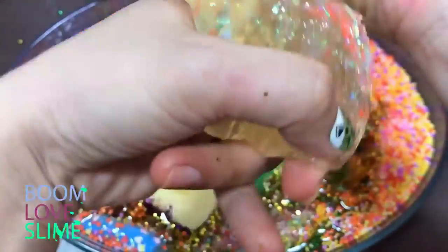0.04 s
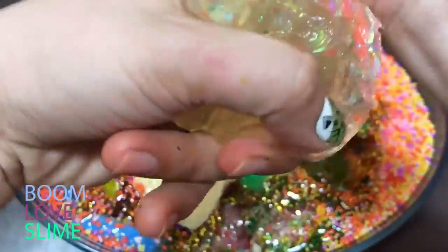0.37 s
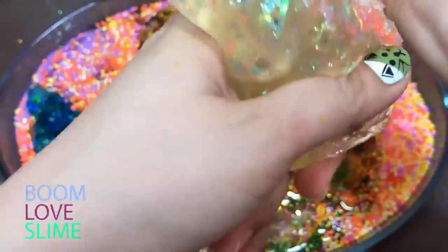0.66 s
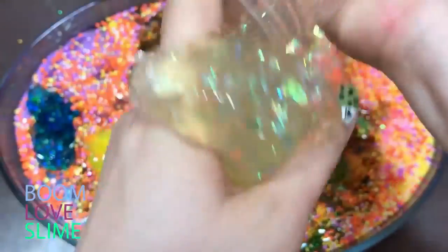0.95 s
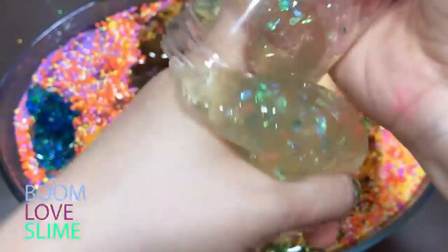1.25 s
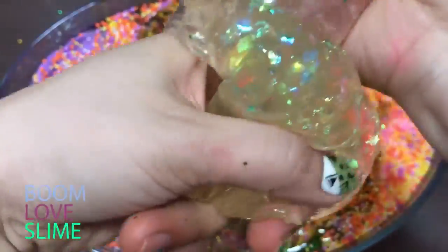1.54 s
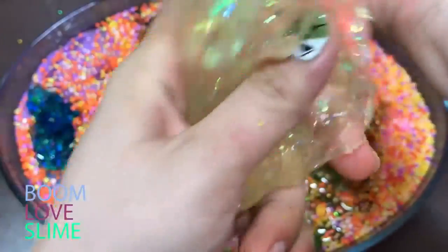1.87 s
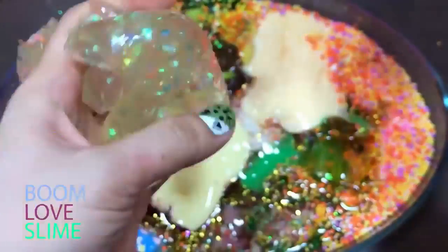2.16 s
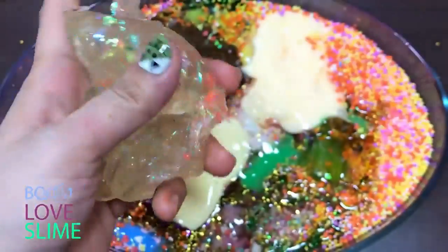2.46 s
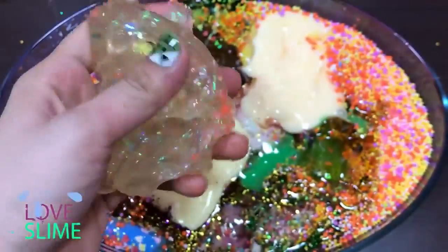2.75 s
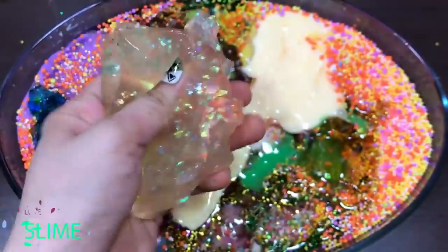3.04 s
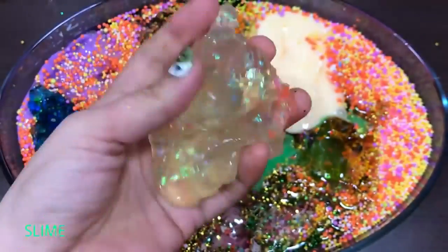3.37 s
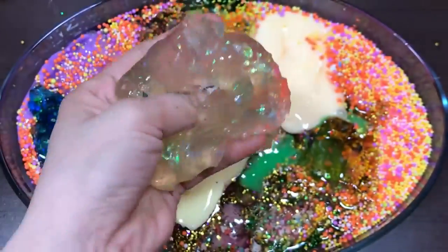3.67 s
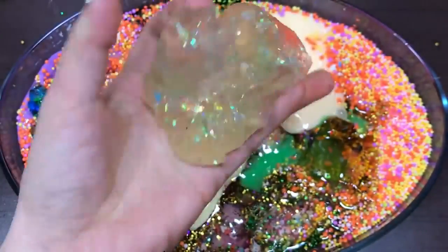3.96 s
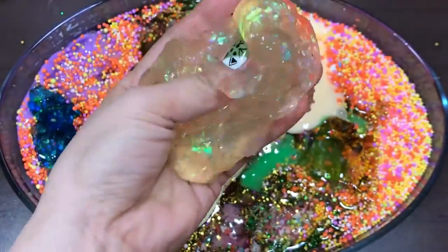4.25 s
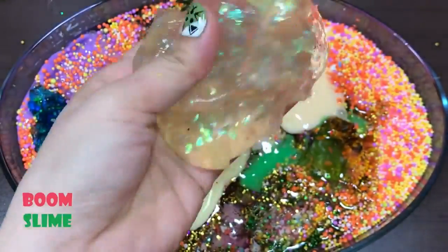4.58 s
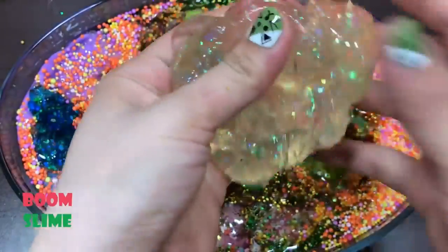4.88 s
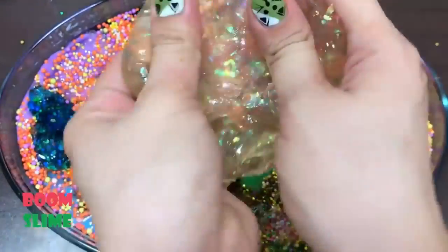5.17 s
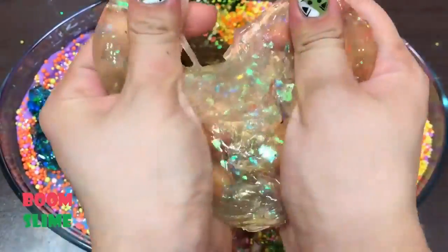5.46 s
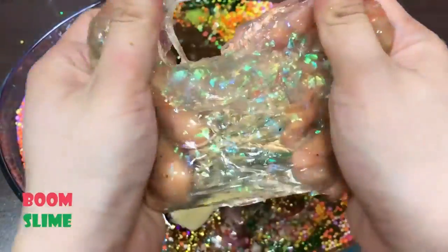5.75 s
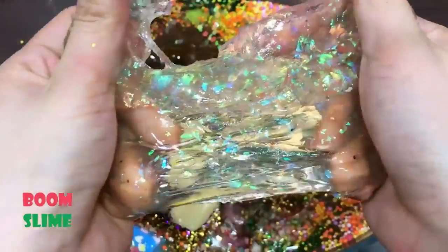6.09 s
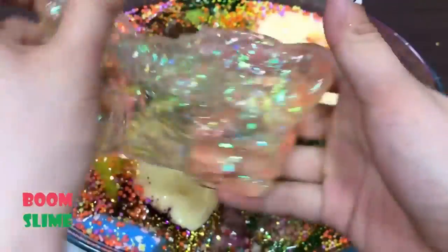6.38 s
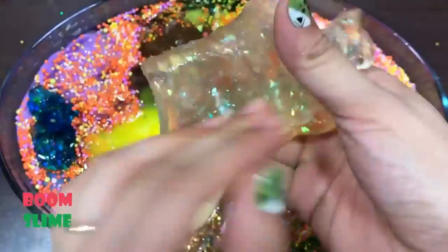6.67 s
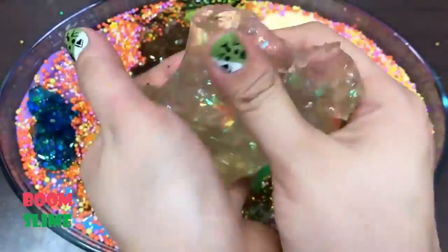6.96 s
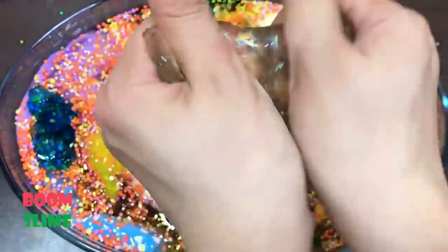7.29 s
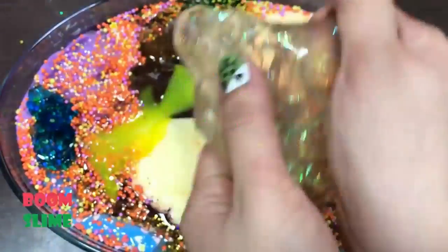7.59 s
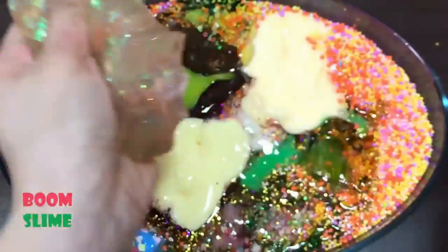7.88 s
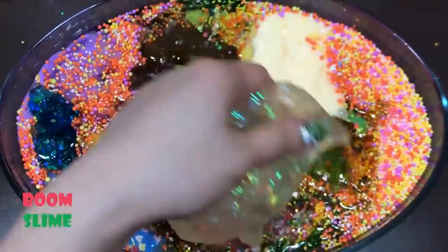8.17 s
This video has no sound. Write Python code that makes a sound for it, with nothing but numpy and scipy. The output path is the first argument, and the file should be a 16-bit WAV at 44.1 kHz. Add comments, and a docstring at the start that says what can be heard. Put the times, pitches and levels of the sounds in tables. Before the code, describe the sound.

Close, reverberant slime squeezing: trapped air bursts sharply, followed by soft sticky crackling, scattered pops and faint low whooshes.

```python
"""Sticky slime is squeezed out of a plastic tube and kneaded over a bowl, close up, with a long reverb.
Over a low hum and faint hiss, a soft low whoosh fades at the start. At 1 s trapped air bursts out
in one loud crack. Throughout, small air pockets pop, squeak and gulp, and the slime crackles as it
peels off the skin. A soft knock booms at 3.4 s; from 6.5 s the whoosh comes four more times."""
import sys
import numpy as np
from scipy import signal
from scipy.fft import rfft, irfft
from scipy.io import wavfile
from scipy.ndimage import uniform_filter1d

SR = 44100
rng = np.random.default_rng(int(sys.argv[2]) if len(sys.argv) > 2 else 0)


def digitize_waveform(pressure):
    """Quantize a signal to 16-bit integers and store it at the path in sys.argv[1].

    Rows of a 2-D input are taken as channels; values are limited to [-1, 1].
    """
    field = np.atleast_2d(pressure).T
    bounded = np.clip(field, -1, 1)
    quanta = np.round(bounded * 32767).astype(np.int16)
    wavfile.write(sys.argv[1], SR, quanta)


N = 362943
TIME = np.arange(N) / SR
CUTOFF_HZ = 16000


def from_db(db):
    """Decibels to gain."""
    return 10 ** (np.asarray(db) / 20)


def unit_rms(x):
    """Scale to rms 1."""
    return x / np.sqrt(np.mean(x ** 2) + 1e-20)


def held(x, length_s):
    """Scale a short sound to the energy of rms 1 held for length_s."""
    return x * np.sqrt(length_s * SR / (np.sum(x ** 2) + 1e-20))


def band(x, low_hz, high_hz, order=2):
    """Causal band-pass."""
    high_hz = min(high_hz, .45 * SR)
    low_hz = min(low_hz, .98 * high_hz)
    return signal.sosfilt(signal.butter(order, [low_hz, high_hz], "band", fs=SR, output="sos"), x)


def colour(x, spectrum, size=8192):
    """Minimum-phase filter through (Hz, dB) points."""
    hz, level_db = np.transpose(spectrum)
    bins_hz = np.fft.rfftfreq(size, 1 / SR)
    gain = from_db(np.interp(np.log(bins_hz + 1), np.log(hz), level_db))
    cepstrum = irfft(np.log(gain))[:size // 2]
    cepstrum[1:] *= 2
    impulse = irfft(np.exp(rfft(cepstrum, size)))
    return signal.fftconvolve(x, impulse)[:len(x)]


def add(out, start_s, sound):
    """Mix a sound in at start_s."""
    at = round(start_s * SR)
    sound = sound[max(-at, 0):N - at]
    out[max(at, 0):max(at, 0) + len(sound)] += sound


# Hiss spectrum. Each row: frequency in Hz, relative density in dB.
HISS_SPECTRUM = [(18, -40), (30, -5.5), (49, -3), (71, 2.5), (822, -21), (1160, -17.5), (2120, -24),
                 (2610, -22), (5310, -33.5), (10500, -31.5), (11400, -41.5), (14800, -25.5), (16000, -39.5)]
# Hum bands. Each row: centre in Hz, width in Hz, level in dB.
HUM_BANDS = [(57.8, 3.2, -66), (64.64, 3.4, -58.5), (107, 15, -76), (126, 11, -69)]


def background(hiss_db=-60.5):
    """Faint hiss and a wavering low hum of narrow noise bands."""
    out = from_db(hiss_db) * unit_rms(colour(rng.standard_normal(N + SR), HISS_SPECTRUM)[SR:])
    for hz, width_hz, level_db in HUM_BANDS:
        hum = band(rng.standard_normal(N + SR), hz - width_hz / 2, hz + width_hz / 2)[SR:]
        out += from_db(level_db) * unit_rms(hum)
    return out


# Reverb response. Each row: frequency in Hz, gain in dB, T60 in seconds.
REVERB_RESPONSE = [(60, -5.5, 5.3), (298, -0.5, 1.05), (390, 4.5, 1), (610, 0, 1), (1530, -1.5, 1),
                   (2100, -1.5, 1), (3784, -2, 1), (7000, -0.5, 0.96), (9507, -3.5, 0.93),
                   (15000, -7.5, 0.49)]


def reverb(x, onset_s=0.011, bloom_s=.18, bloom_db=3.0, bands=26, hop=64):
    """A diffuse tail: each band stores energy and returns it as dying noise, swelling a second time."""
    t = TIME[:2 * SR:hop]
    bloom = from_db(bloom_db * np.clip((t - bloom_s) / .025 + .5, 0, 1))
    shape = np.clip(t / onset_s, 0, 1) * bloom
    points_hz, points_db, points_t60_s = np.transpose(REVERB_RESPONSE)
    edges_hz = np.geomspace(300, 16300, bands + 1) - 230
    white = rng.standard_normal((2, N))
    out, starts = np.zeros(N), np.arange(0, N, hop)
    for k, (low_hz, high_hz) in enumerate(zip(edges_hz, edges_hz[1:])):
        log_centre = np.log(low_hz * high_hz) / 2
        gain_db = np.interp(log_centre, np.log(points_hz), points_db)
        t60_s = np.interp(log_centre, np.log(points_hz), points_t60_s)
        decay = (shape * from_db(-60 * t / t60_s)) ** 2
        power = np.add.reduceat(band(x, low_hz, high_hz, order=3) ** 2, starts) / hop
        stored = np.convolve(power, decay / decay.sum())[:len(starts)]
        envelope = np.repeat(np.sqrt(stored), hop)[:N]
        out += from_db(gain_db) * envelope * unit_rms(band(white[k % 2], low_hz, high_hz))
    return out


# Noise bands of one whoosh. Each row: low and high edge in Hz, peak delay, rise and decay in seconds,
# level in dB.
WHOOSH_BANDS = [(319, 407, 0.072, 0.031, 0.022, -54), (204, 515, 0.16, 0.075, 0.16, -53.5),
                (42.8, 160, 0.17, 0.062, 0.26, -51), (840, 3000, 0.11, 0.032, 0.66, -65)]
# Whooshes. Each row: start in seconds, gain in dB.
WHOOSH_EVENTS = [(-.14, 5), (6.45, 3), (6.902, 3.5), (7.388, -1), (7.873, 2)]


def whooshes():
    """One soft swell of low noise, repeated; its bass comes late and lingers."""
    out, whoosh, t = np.zeros(N), np.zeros(SR), TIME[:SR]
    for low_hz, high_hz, peak_s, rise_s, decay_s, level_db in WHOOSH_BANDS:
        rise = np.exp(-.5 * ((t - peak_s) / rise_s) ** 2)
        fall = np.exp((peak_s - t) / decay_s)
        noise = unit_rms(band(rng.standard_normal(SR), low_hz, high_hz))
        whoosh += from_db(level_db) * np.where(t < peak_s, rise, fall) * noise
    for start_s, gain_db in WHOOSH_EVENTS:
        add(out, start_s, from_db(gain_db) * whoosh)
    return out


# Modes rung by the knock. Each row: frequency in Hz, level in dB re the knock, T60 in seconds.
KNOCK_RESONANCES = [(72, -23, .5), (110, -0.5, 1.5), (217, -4, 1.08), (240, 4.5, 0.11), (296, -6.5, 0.8),
                    (427, -16.5, 0.88), (815, -11, 0.36), (995, -28, 0.41), (1880, -27, 0.86),
                    (3050, -13.5, 0.67), (3070, -20, .4), (4600, -22, 0.47), (6630, -25, 0.55)]


def knock(start_s=3.359, level_db=-45.5, rumble_db=-7.5, rumble_t60_s=0.84,
          flutter_db=7.0, flutter_s=0.012):
    """A soft knock leaves a low boom, faint fluttering overtones and a rough dying rumble."""
    out, t = np.zeros(N), TIME[:2 * SR]
    for hz, mode_db, t60_s in KNOCK_RESONANCES:
        flutter = np.interp(t / flutter_s, np.arange(SR), rng.standard_normal(SR))
        envelope = from_db(level_db + mode_db + flutter_db * flutter - 60 * t / t60_s)
        add(out, start_s, envelope * np.sin(2 * np.pi * hz * t))
    rumble = unit_rms(band(rng.standard_normal(len(t)), 150, 660, order=1))
    add(out, start_s, from_db(level_db + rumble_db - 60 * t / rumble_t60_s) * rumble)
    return out


# Hand activity. Each row: time in seconds, gain in dB on ticks, cling crackle and small pops.
HAND_ACTIVITY = [(0, 6.5), (.7, 7), (2.1, 7), (2.7, -4), (3.6, 1.5), (4.2, -6.5), (5.0, -2), (5.45, 2.5),
                 (6.1, -10), (6.8, 2), (7.4, 4), (8.2, -7.5)]


def kneading_db(time_s):
    """How busily the hands work the slime, as a gain."""
    return np.interp(time_s, *np.transpose(HAND_ACTIVITY))


def threads(per_s, low_hz, high_hz, spread_db, db_per_octave, bands=7):
    """Tiny threads snap at random, each with its own size and pitch band; rms 1."""
    sizes = from_db(spread_db * np.minimum(rng.exponential(1, N), 4)) * rng.choice([-1, 1], N)
    clicks = sizes * (rng.random(N) < per_s / SR)
    click_band = rng.integers(0, bands, N)
    out = np.zeros(N)
    for k, hz in enumerate(np.geomspace(low_hz, high_hz, bands)):
        snaps = band(clicks * (click_band == k) + 1e-18, hz / 1.6, hz * 2.2, order=1)
        out += from_db(db_per_octave * np.log2(hz / low_hz)) * snaps
    return unit_rms(out)


# Pulls off the skin. Each row: peak time in seconds, Gaussian width in seconds, crackle level in dB,
# squelch in dB re the crackle.
SKIN_PULLS = [(0.374, 0.024, -52, -26), (0.573, 0.0083, -54, -4.5), (0.605, .018, -54, 0),
              (0.81, 0.051, -64.5, 8.5), (1.598, 0.04, -50, -3.5), (1.79, 0.064, -66.5, 5.5),
              (1.934, .02, -52, 7.5), (1.98, 0.017, -39, -2.5), (2.024, 0.031, -49, -4),
              (2.107, 0.016, -56, -10), (2.212, 0.022, -54.5, -5.5), (2.336, 0.01, -47, 0.5),
              (2.681, 0.01, -64.5, -6), (2.861, 0.028, -67, -10), (3.228, 0.022, -47, -13.5),
              (3.502, 0.0063, -57.5, -1), (3.701, .022, -65, -2), (3.749, 0.0092, -32.5, -27.5),
              (3.924, 0.015, -48.5, -14), (4.293, .014, -58, -18.5), (4.553, 0.017, -48, -15.5),
              (4.86, 0.029, -60.5, -9), (5.09, 0.014, -60, -17.5), (5.41, .07, -62, 1),
              (5.675, .007, -68, 9.5), (5.84, 0.055, -60.5, -13), (6.32, 0.052, -63.5, -11.5),
              (6.46, .04, -69, -10.5), (6.774, 0.019, -54, -3), (7.162, 0.025, -66.5, -16),
              (7.393, .022, -61, -20), (7.45, 0.008, -45.5, -21), (7.551, 0.03, -45, -4),
              (7.808, 0.015, -54, -1), (8.207, 0.012, -56.5, -2.5)]


def peeling(cling_db=-79, tick_db=-79, clump_db=3.5, clump_s=0.008):
    """Slime lets go of the skin in clumps of crackle and squelch; lone threads tick in between."""
    activity = from_db(kneading_db(TIME))
    crackle_gain = from_db(cling_db) * activity   # slime clinging to moving fingers
    squelch_gain = np.zeros(N)
    for peak_s, width_s, crackle_db, squelch_db in SKIN_PULLS:
        t = np.arange(-4 * width_s, 4 * width_s, 1 / SR)
        swell = from_db(crackle_db) * np.exp(-.5 * (t / width_s) ** 2)
        add(crackle_gain, peak_s + t[0], swell)
        add(squelch_gain, peak_s + t[0], from_db(squelch_db) * swell)
    wander = np.interp(TIME / clump_s, np.arange(N), rng.standard_normal(N))
    clumps = unit_rms(from_db(clump_db * wander))
    crackle = threads(per_s=1200, low_hz=3320, high_hz=15000, spread_db=3.8, db_per_octave=0.0)
    squelch = threads(per_s=1500, low_hz=204, high_hz=2600, spread_db=3.0, db_per_octave=-1.5)
    ticks = threads(per_s=43, low_hz=2500, high_hz=14000, spread_db=5.0, db_per_octave=-0.5)
    peel = clumps * (crackle_gain * crackle + squelch_gain * squelch)
    return peel + from_db(tick_db) * activity * ticks


# Short falling tones. Each row: start and length in seconds, start and end pitch in Hz, level in dB.
SQUEAKS_AND_GULPS = [(.002, .04, 720, 560, -47), (.572, .024, 1530, 1500, -49),
                     (.9713, .002, 2000, 900, -15), (.9728, .005, 480, 380, -18),
                     (1.944, .008, 1300, 900, -41), (1.990, .012, 450, 330, -42),
                     (5.667, .014, 3200, 350, -59), (7.255, .009, 14900, 14200, -38),
                     (7.267, .012, 1560, 1470, -40), (7.288, .023, 11100, 10900, -57)]


def squeaks_and_gulps(waver=0.019):
    """Short, unsteady falling tones, heard as high squeaks, low gulps and the burst's low ring."""
    out = np.zeros(N)
    for start_s, length_s, start_hz, end_hz, level_db in SQUEAKS_AND_GULPS:
        size = int(length_s * SR)
        flutter = 1 + waver * unit_rms(uniform_filter1d(rng.standard_normal(size), size=30))
        phase = 2 * np.pi * np.cumsum(np.geomspace(start_hz, end_hz, size) * flutter) / SR
        tone = unit_rms(np.sin(phase) * signal.windows.tukey(size, .4))
        add(out, start_s, from_db(level_db) * tone)
    return out


def tear(length_s, spread_db, snap):
    """A film gives way: one snap, then a fast-dying volley of tiny rips."""
    t = TIME[:SR // 20]
    rips = rng.standard_normal(len(t)) * from_db(spread_db * rng.standard_normal(len(t)))
    rips = unit_rms(rips) * np.exp(-(t / length_s) ** 1.3)
    rips[0] += snap
    return rips


def pocket(hz, length_s, waver=0.057):
    """An air pocket rings and dies; its soft wall makes the pitch waver, most in tiny pockets."""
    age = TIME[:SR // 20] / length_s
    wall = unit_rms(signal.lfilter(signal.windows.hann(40), 1, rng.standard_normal(len(age))))
    depth = waver + .12 * (hz / CUTOFF_HZ) ** 1.5
    phase = 2 * np.pi * np.cumsum(hz * (1 + depth * wall)) / SR
    return np.sin(phase) * age ** 0.12 * np.exp(-2 * age ** 2)


def pop(length_s, hz, ring_db, tear_db, thump_corner_hz=1500, fizz_corner_hz=5760):
    """A tearing film rings its air pocket; big pockets thump and crack, tiny ones fizz."""
    rips = tear(length_s, spread_db=3.0, snap=5.2)
    fine_rips = rips * np.exp(-TIME[:len(rips)] / (5.7 * length_s))   # the finest end first
    thump_db = -7.5 - 10.5 * max(np.log2(hz / thump_corner_hz), 0)
    fizz_share = 1 / (1 + (fizz_corner_hz / hz) ** 4.9)
    ring = held(pocket(hz, length_s), length_s)
    thump = from_db(thump_db) * held(band(rips, 240, 1700), length_s)
    crack = np.sqrt(1 - fizz_share) * held(band(rips, 2300, 7900, order=3), length_s)
    fizz = np.sqrt(fizz_share) * held(band(fine_rips, 5500, 15000), length_s)
    return from_db(ring_db) * (ring + thump) + from_db(tear_db) * (crack + fizz)


def small_pops(per_s=16, low_hz=4020, high_hz=14760, base_db=-65, spread_db=2.5, draws=200):
    """Small pockets pop at random, louder while the hands are busy."""
    out = np.zeros(N)
    wait_draws, pitch_draws = rng.random((draws, 2)).T
    starts_s = np.cumsum(-np.log(1 - wait_draws)) / per_s
    pitches_hz = low_hz * (high_hz / low_hz) ** pitch_draws
    levels_db = base_db + kneading_db(starts_s) + spread_db * rng.standard_normal(draws)
    for start_s, hz, level_db in zip(starts_s, pitches_hz, levels_db):
        sound = pop(length_s=.0016, hz=hz, ring_db=level_db, tear_db=level_db + 3)
        if start_s < TIME[-1]:
            add(out, start_s, sound)
    return out


# Air pockets. Each row: start and length in seconds, pitch in Hz, ring level in dB, tear level in dB.
AIR_POCKETS = [(.055, 0.0074, 1522, -22, -72), (0.0554, 0.0032, 910, -21, -73),
               (0.135, 0.00076, 14000, -44, -46.5), (0.278, 0.0072, 1300, -41, -62),
               (0.499, 0.011, 14000, -53, -57), (0.699, 0.0044, 13950, -49, -51.5),
               (.795, 0.0018, 2040, -44.5, -52), (0.833, 0.0025, 6800, -46, -44),
               (0.943, 0.009, 400, -49, -54), (0.9577, 0.0033, 7500, -46, -32.5),
               (1.525, 0.0068, 3420, -33, -36), (1.569, 0.0014, 2840, -34.5, -33),
               (1.608, 0.0068, 2940, -40.5, -30), (1.642, 0.0098, 1780, -49, -51),
               (1.753, 0.0054, 2800, -46, -45), (1.8035, 0.009, 8800, -48.5, -44.5),
               (1.913, 0.015, 5980, -43, -40.5), (1.9206, 0.0057, 3620, -39.5, -48),
               (2.0195, 0.0032, 13900, -38, -44), (2.334, 0.0047, 7180, -42, -38),
               (2.345, 0.0032, 2420, -40, -50), (2.4306, 0.0043, 2010, -56, -55.5),
               (2.553, 0.0092, 2453, -45.5, -44), (3.207, 0.0037, 10150, -52, -43.5),
               (3.2255, .0034, 4440, -46.5, -46), (3.357, 0.0092, 3010, -41, -47),
               (3.4255, .0016, 10800, -68, -51), (3.564, 0.014, 301, -51.5, -73.5),
               (3.7521, 0.0009, 5180, -17.5, -21), (3.753, 0.0065, 3760, -27, -30),
               (3.911, 0.0028, 14000, -42, -37.5), (3.9113, 0.0022, 4200, -42, -47),
               (4.22, 0.0035, 5020, -63.5, -51.5), (5.195, 0.0024, 14000, -57.5, -52.5),
               (5.289, 0.0017, 6000, -75, -42), (5.3136, 0.0016, 14500, -31, -42),
               (5.3561, 0.0042, 11830, -45.5, -59), (5.5213, .0043, 3940, -55, -69),
               (5.884, .0026, 3650, -57, -53), (7.22, 0.0038, 1443, -30.5, -38),
               (7.2307, 0.0066, 4130, -35, -34), (7.231, 0.0065, 1370, -38, -52),
               (7.44, 0.0057, 12250, -58, -49), (7.523, 0.0061, 12800, -50, -30.5),
               (7.5584, 0.0012, 13000, -24, -17), (7.569, 0.0019, 7000, -17, -16.5),
               (7.571, 0.0032, 5260, -22.5, -35)]


def pops():
    """The larger air pockets pop one by one."""
    out = np.zeros(N)
    for start_s, length_s, hz, ring_db, tear_db in AIR_POCKETS:
        add(out, start_s, pop(length_s, hz, ring_db, tear_db))
    return out


# Tears of the burst. Each row: start in seconds, length in seconds, level in dB.
BURST_TEARS = [(0.976, 0.0017, -6.5), (0.9801, 0.0012, -5), (0.9838, 0.00061, -10), (0.986, 0.00034, -14.5)]
# Burst spectrum. Each row: frequency in Hz, relative density in dB.
BURST_SPECTRUM = [(60, -25), (150, -14), (310, -18.5), (430, -4.5), (680, -10.5), (1060, -7.5),
                  (1600, -12.5), (2000, -1.5), (2520, 1.5), (3300, -2), (5000, -3.5), (9200, -5.5),
                  (14400, -12.5), (16000, -21.5)]


def burst(mouth_hz=2450, mouth_db=-10.0):
    """Air trapped in the tube breaks through in a few violent tears, each ringing the tube's mouth."""
    out = np.zeros(N)
    for start_s, length_s, level_db in BURST_TEARS:
        rips = tear(length_s, spread_db=4.0, snap=0.73)
        blast = held(colour(rips, BURST_SPECTRUM), length_s)
        mouth = held(pocket(mouth_hz, length_s, waver=0.067), length_s)
        add(out, start_s, from_db(level_db) * (blast + from_db(mouth_db) * mouth))
    return out


def scene():
    """Mono mix; all the slime sounds feed the reverb, the burst most strongly."""
    popping, tones, crack, peel = pops() + small_pops(), squeaks_and_gulps(), burst(), peeling()
    slime = popping + tones + crack + peel
    send = (from_db(-11) * popping + from_db(-15.5) * tones
            + from_db(2.25) * crack + from_db(-14.5) * peel)
    return (slime + reverb(send) + knock() + whooshes() + background())[None]


def record(dry):
    """High-pass at 38 Hz, clip at full scale, steep low-pass."""
    high_pass = signal.butter(4, 38, "high", fs=SR, output="sos")
    low_pass = signal.ellip(10, .1, 90, CUTOFF_HZ, fs=SR, output="sos")
    clipped = np.clip(signal.sosfilt(high_pass, dry), -1, 1)
    return signal.sosfilt(low_pass, clipped)


dry = scene()
out = record(dry)
digitize_waveform(out)
```